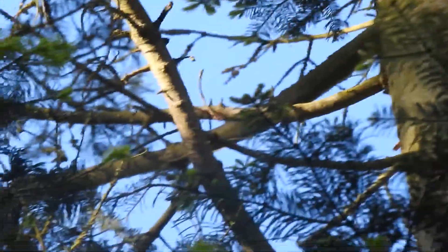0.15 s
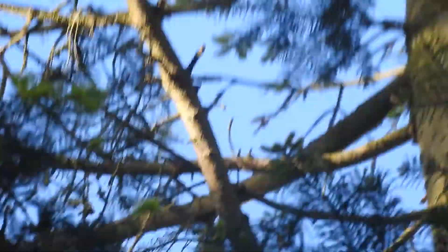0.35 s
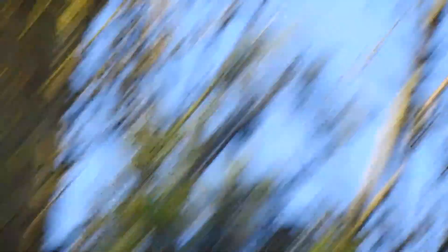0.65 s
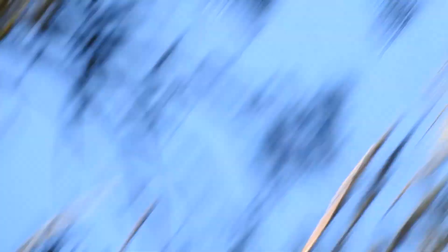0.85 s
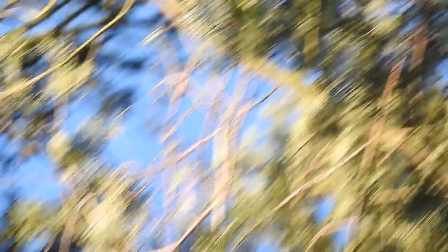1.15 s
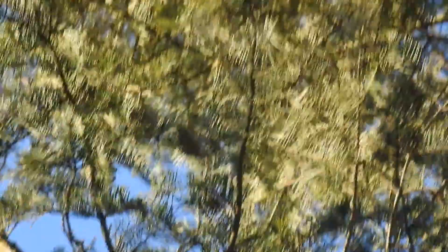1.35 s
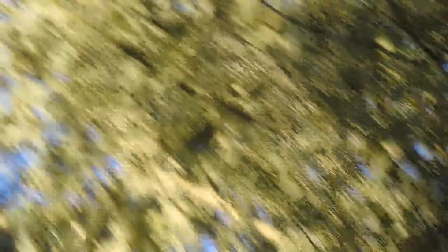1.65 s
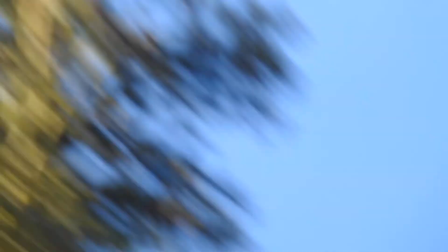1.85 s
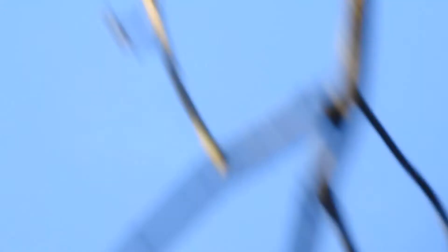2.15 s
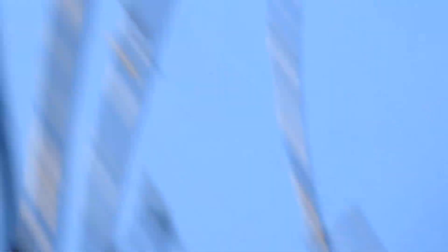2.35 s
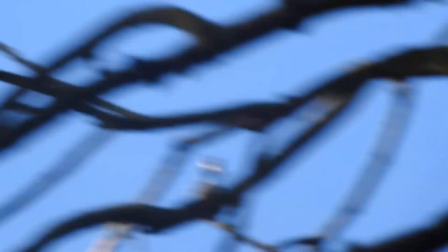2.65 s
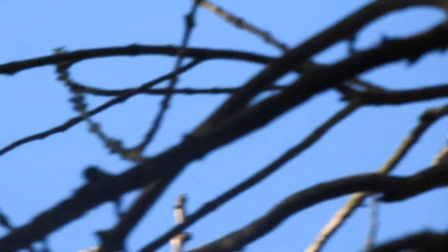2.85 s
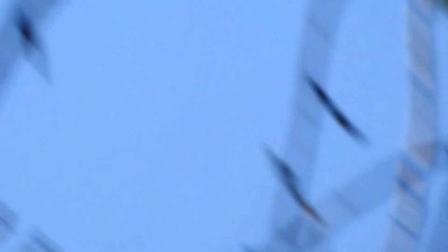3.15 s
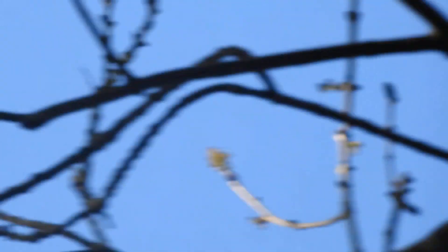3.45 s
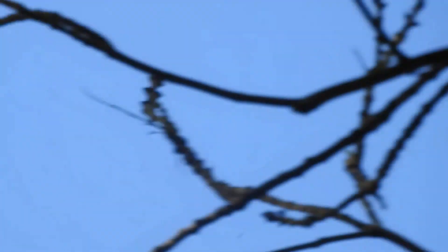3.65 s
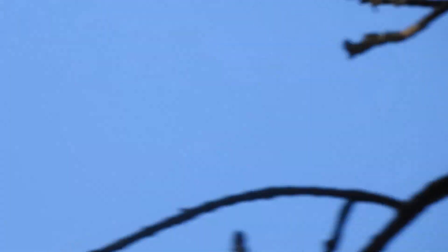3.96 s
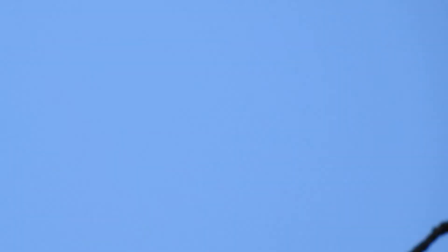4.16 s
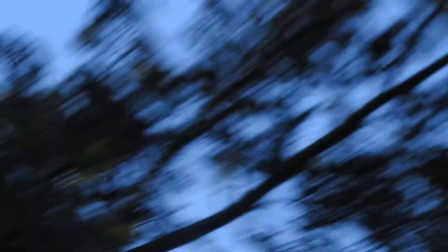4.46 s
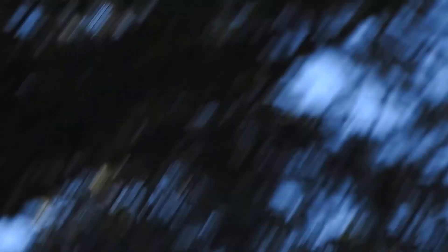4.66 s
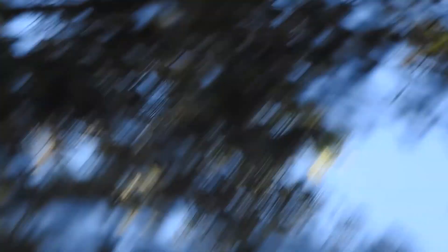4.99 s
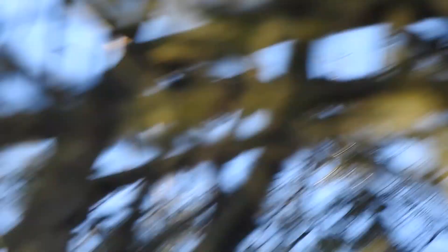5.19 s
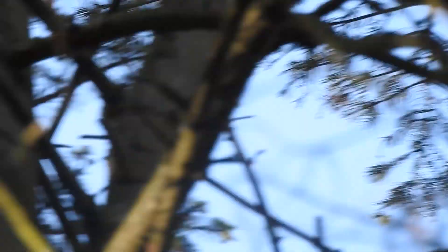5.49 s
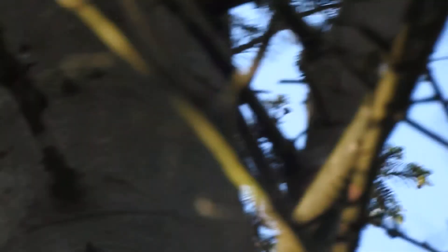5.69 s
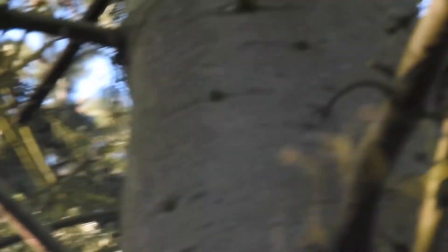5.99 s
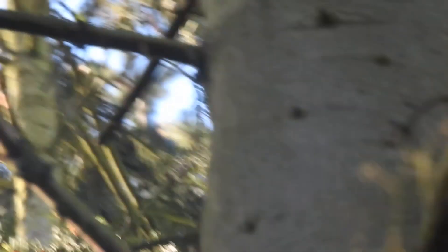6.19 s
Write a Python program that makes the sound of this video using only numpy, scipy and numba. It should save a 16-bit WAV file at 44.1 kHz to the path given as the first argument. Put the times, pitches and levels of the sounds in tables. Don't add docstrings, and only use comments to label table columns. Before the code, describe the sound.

A quiet forest in stereo, heard from a handheld camera: soft airy hush, slight hiss, faint road rumble and a blurred haze of far birds. From 0 to 2.5 seconds a thrush-like bird gives short sliding whistles, with buzzy little trills near the start. From 0.9 to about 4 seconds a warbler alternates high and low clear notes, each starting with a sharp falling chip. At 2.4 a raven tries a faint croak, then calls loudly at 2.65, 3.1 and 3.8: brief, hoarse, rattling, throaty bursts under a fifth of a second, with echoing woodland tails. Softer croaks follow at 4.4, 5.1, 5.7 and 6.3 as it moves away. A dull finger tap on the camera comes at 4.7. Traffic rumble swells around 5.3, and thin high whistles and a quick bright downward chirp sound near 5.7.

```python
import sys
import numpy as np
from scipy import signal
from scipy.fft import rfft, irfft
from scipy.io import wavfile
from scipy.ndimage import uniform_filter1d
from numba import njit

SR = 44100
rng = np.random.default_rng(int(sys.argv[2]) if len(sys.argv) > 2 else 0)


def makeup_ratio(level_db):
    decades = np.asarray(level_db, float) / 20
    return 10 ** decades


def wav_record(signal):
    frames = np.transpose(np.atleast_2d(signal))
    bounded = np.clip(frames, -1, 1)
    quanta = np.round(bounded * 32767).astype(np.int16)
    wavfile.write(sys.argv[1], SR, quanta)


N = 279135
TIME = np.arange(N) / SR


def level(x, db):
    return x * makeup_ratio(db) / np.sqrt(np.mean(x ** 2) + 1e-18)


def walk(rate_hz):
    hold = int(SR / rate_hz)
    steps = np.repeat(rng.standard_normal(N // 20)[:N // hold + 1], hold)
    return 1.16 * uniform_filter1d(uniform_filter1d(steps, hold), hold)[:N]


@njit
def svf(x, hz, width):
    y, band, low = np.empty(len(x)), 0., 0.
    for i in range(len(x)):
        g = np.tan(np.pi * hz[i] / SR)
        k = width / hz[i]
        v = (band + g * (x[i] - low)) / (1 + g * (g + k))
        band = 2 * v - band
        low = low + 2 * g * v
        y[i] = k * v
    return y


def resonate(x, hz, width_hz):
    centre = np.full(len(x), 1.) * hz
    return svf(svf(x, centre, 1.61 * width_hz), centre, 1.61 * width_hz)


def flap_gate(gone, chance):
    first_hz, last_hz = 79.6, 46.38
    flap_hz = np.interp(gone, [0, .18, .45, 1], [first_hz, .95 * first_hz, last_hz, .85 * last_hz])
    uneven = 1 + 1.6 * uniform_filter1d(chance, size=400)
    flap = .22 + np.cumsum(flap_hz * uneven) / SR
    sharpness = np.interp(gone, [0, .25, .45, 1], [.3, .55, 1.4, 2.5])
    shut = (.5 + .5 * np.cos(2 * np.pi * flap)) ** sharpness
    gate = 1 - np.interp(gone, [0, .28, .42, 1], [1, .95, .55, .4]) * shut
    return flap, shut, gate


def syrinx_turns(gone, flap, top_hz, steady):
    drop, last_hz = .74, .92 * top_hz
    hz = np.interp(gone, [0, .3, drop - .08, drop + 0.058, 1.01],
                   [.8 * top_hz, .94 * top_hz, top_hz, last_hz, 1.1 * last_hz])
    bend = .06 * np.cos(2 * np.pi * (flap - .12))
    return np.cumsum(hz * (1 - steady * bend)) / SR


def syrinx_pulses(turns, early_late, strength):
    size, jitter_cycles, shimmer_db = len(turns), .025, 2.0
    cycle = np.arange(1, int(turns[-1]))
    when = np.interp(cycle + jitter_cycles * early_late[cycle], turns, np.arange(size))
    force = makeup_ratio(shimmer_db * strength[cycle])
    pulses = np.zeros(size + 1)
    np.add.at(pulses, when.astype(int), force * (1 - when % 1))
    np.add.at(pulses, when.astype(int) + 1, force * (when % 1))
    return level(pulses[:size] - pulses.mean(), 0)


# (pitch_hz, width_hz, level_db)
THROAT_HOLLOWS = [
    (560, 110, -25),
    (923, 336, -10),
    (1140.6, 49.6, 1),
    (1293, 79.4, 6),
    (1520, 101, -4),
]


def throat_ring(rough, gone, open_hz):
    hollow_db = 10.5 * np.clip(1 - gone / 0.21, 0, 1)
    ring = 0
    for k, (hz, width_hz, db) in enumerate(THROAT_HOLLOWS):
        ring = ring + (-1) ** k * makeup_ratio(db + hollow_db * (hz < 1000)) * resonate(rough, hz, width_hz)
    beak_shut_hz = 1463
    beak_hz = beak_shut_hz + (open_hz - beak_shut_hz) * gone
    return ring - makeup_ratio(-6) * resonate(rough, beak_hz, 172.0)


# (pitch_hz, width_hz, level_db)
RASP_RINGS = [
    (2820, 435, 6.5),
    (3800, 2500, 3),
    (4720, 3200, -1.5),
    (6300, 460, -0.5),
    (8630, 2700, -47),
]


def beak_rasp(torn, gone, tilt_db):
    opening_db = -2.8 * np.clip(1 - gone / 0.86, 0, 1)
    rasp = 0
    for k, (hz, width_hz, db) in enumerate(RASP_RINGS):
        rasp = rasp + (-1) ** k * makeup_ratio(db + k * (tilt_db + opening_db)) * resonate(torn, hz, width_hz)
    return signal.sosfilt(signal.butter(3, 6400, fs=SR, output="sos"), rasp)


# (share_of_croak_0_to_1, level_db, rasp_above_throat_db, lowest_partial_db)
EFFORT = [
    (0, -27.5, 9, -9),
    (.04, -7.5, 2.5, -7),
    (.2, -1.5, -1.5, -19),
    (.45, -1.5, -1.5, -15),
    (.65, -0.5, -3.25, -19.5),
    (.78, -4.5, -5.5, -10),
    (.86, -0.5, -5, -34),
    (1, -17, -10, -17),
]
# (time_s, rasp_db, rasp_tilt_db_per_ring)
FACING = [
    (2.5, -5, 3.5),
    (3.2, -3.5, 4.5),
    (3.9, -8, 1.6),
    (4.5, -4, 0.4),
    (5.2, -10, 1.3),
    (6.3, -10, 1),
]


def croak(start_s, length_s, db, top_hz, open_hz):
    start, size = int(start_s * SR), int(length_s * SR) + 1200
    t = np.arange(size) / SR
    gone = np.clip(t / length_s, 0, 1)
    share, *columns = np.transpose(EFFORT)
    effort_db, rasp_db, low_db = (np.interp(gone, share, c) for c in columns)
    facing_s, *columns = np.transpose(FACING)
    facing_db, tilt_db = (np.interp(start_s, facing_s, c) for c in columns)

    early_late, strength, breath, flutter, hiss = rng.standard_normal((5, 16000))[:, :size]
    flap, shut, gate = flap_gate(gone, flutter)
    steady = np.interp(gone, [.69, .78], [1, .35])
    turns = syrinx_turns(gone, flap, top_hz, steady)
    clean = syrinx_pulses(turns, early_late, strength) * gate
    puff = gate * (.15 + np.exp(-(turns % 1) / .35))
    rough = clean + steady * .28 * level(puff * breath, 0)
    torn = clean + .7 * level(puff * hiss, 0)

    throat = throat_ring(rough, gone, open_hz)
    rasp = beak_rasp(torn, gone, tilt_db)
    low = (1 - 0.6 * shut) * np.clip(gone / .25, 0, 1) * np.sin(2 * np.pi * turns)
    voice = np.array([level(throat, 0) + makeup_ratio(low_db) * level(low, 0),
                      makeup_ratio(rasp_db + facing_db) * level(rasp, 0)])
    ends = np.clip(t / .003, 0, 1) * np.clip((length_s + 0.021 - t) / 0.063, 0, 1)
    out = np.zeros((2, N + size))
    out[:, start:start + size] = voice * ends * makeup_ratio(db + effort_db)
    return out[:, :N]


# (start_s, length_s, level_db, highest_pitch_hz, open_beak_ring_hz)
CROAKS = [
    (2.379, 0.24, -43.5, 407.5, 1710),
    (2.654, .17, -22.5, 392.1, 1770),
    (3.112, 0.15, -22.5, 405.1, 1720),
    (3.827, 0.17, -22, 408.8, 1630),
    (4.399, 0.18, -26, 401.3, 1870),
    (5.111, .19, -27, 418, 1820),
    (5.7, .18, -27, 401.5, 1680),
    (6.271, 0.18, -28.5, 401, 1570),
]


def raven():
    throat, rasp = sum(croak(*row) for row in CROAKS)
    return (trunks(throat, -11, pan_db=0.2, near=.7, patchy_db=1.5)
            + trunks(rasp, -4, pan_db=0.6, near=.8))


def whistle(notes, flutter_db=2.0, trill_hz=0., swing_hz=0., sweep_db=0., attack=0.15):
    out = np.zeros(N + SR)
    for start_s, first_hz, last_hz, glide_s, length_s, db in notes:
        t = np.arange(int(length_s * SR)) / SR
        left = np.exp(-t / glide_s)
        trill = swing_hz * np.sin(2 * np.pi * trill_hz * t)
        hz = last_hz + (first_hz - last_hz) * left + trill
        ends = np.clip(np.minimum(t / attack, (length_s - t) / .25) / length_s, 0, 1)
        shape = ends * makeup_ratio(db + 2.5 + sweep_db * left)
        start = max(int(start_s * SR), 0)
        out[start:start + len(t)] += shape * np.sin(2 * np.pi * np.cumsum(hz) / SR)
    return out[:N] * makeup_ratio(flutter_db * walk(90))


def gliding(notes):
    return [(start_s, first_hz, last_hz, .7 * length_s, length_s, db)
            for start_s, first_hz, last_hz, length_s, db in notes]


# (start_s, held_pitch_hz, level_db)
WARBLER = [
    (0.903, 5320, -48),
    (1.276, 4150, -44),
    (1.595, 5234, -42),
    (1.961, 3800, -42),
    (2.289, 4654, -38),
    (2.614, 5330, -40),
    (2.967, 3730, -39.5),
    (3.297, 4710, -41),
    (3.608, 5200, -39),
    (3.978, 4170, -40.5),
]


def warbler():
    fall_from_hz, fall_s, flick_s = 7550, .0065, 0.027
    held, flicks = [], []
    for start_s, hz, db in WARBLER:
        hold_s = 0.016 * hz / 1000 - 0.026
        held_db = db + 2.5 * (hz - 5000) / 1000
        held.append((start_s, fall_from_hz, hz, fall_s, hold_s, held_db))
        if hz > 5000:
            flicks.append((start_s + .04, hz, 2760, flick_s / 2, flick_s, db - 10.5))
    song = whistle(held + flicks, 1.33, sweep_db=15.5, attack=0.075)
    return trunks(song, 1.3, lag=2.3, pan_db=1.0, near=1.35, patchy_db=1.0)


# (start_s, first_pitch_hz, last_pitch_hz, length_s, level_db)
THRUSH = [(.02, 2330, 2380, 0.038, -59), (.065, 2700, 3180, 0.025, -49), (.14, 2450, 2844, .05, -53),
          (.29, 2370, 2360, 0.028, -49), (.38, 2370, 2270, .036, -65), (.47, 2370, 2350, 0.056, -79),
          (.64, 2400, 3540, 0.069, -51.5), (.68, 3200, 2320, .025, -51.5), (.815, 2150, 3700, 0.054, -48),
          (.92, 2920, 3110, 0.16, -59.5), (1.2, 2400, 3220, 0.025, -49.5), (1.27, 3050, 3010, .09, -56),
          (1.36, 2300, 3280, 0.1, -51), (1.5, 2950, 2820, .14, -63), (1.69, 2300, 3300, 0.058, -49.5),
          (1.86, 2250, 3370, 0.07, -49), (2.17, 4000, 4460, 0.035, -56), (2.255, 2500, 3045, .068, -53.5),
          (2.44, 2900, 3050, 0.083, -51)]


def thrush():
    song = whistle(gliding(THRUSH), 2.9, sweep_db=-1.0)
    return trunks(song, .5, lag=-1.3, pan_db=2.5, near=.1, patchy_db=0.5)


# (start_s, first_pitch_hz, last_pitch_hz, length_s, level_db)
TREETOP = [(0., 5600, 5250, 0.096, -57), (.55, 4600, 4530, 0.06, -55.5), (1.1, 4950, 2960, .035, -51),
           (1.14, 8500, 7480, .55, -64), (1.71, 3920, 4050, 0.067, -54.5), (3.4, 4420, 4620, 0.19, -54.5),
           (4.361, 9870, 4000, 0.0042, -43), (4.75, 8130, 7740, .33, -69), (4.89, 3480, 3370, 0.13, -58),
           (4.9, 7270, 7040, 0.26, -62), (5.02, 6190, 6000, 0.094, -54), (5.46, 4510, 4350, .29, -67),
           (5.563, 5680, 9400, 0.01, -56), (5.62, 8450, 7596, 0.41, -47.5),
           (5.66, 8150, 4870, 0.0081, -40.5), (5.751, 8200, 3300, 0.047, -37),
           (6.1, 3800, 3590, 0.47, -61.5)]


def treetop_birds():
    return trunks(whistle(gliding(TREETOP), 3.5), -5, lag=1, pan_db=-1.0)


# (start_s, first_pitch_hz, last_pitch_hz, length_s, level_db)
TRILLS = [
    (.002, 4950, 4850, 0.036, -49),
    (.185, 6200, 6610, 0.13, -54.5),
    (.21, 7160, 7330, .11, -58),
    (.6, 3410, 3410, 0.11, -62.5),
    (5.87, 6300, 6850, 0.041, -52),
]


def trilling_birds():
    return trunks(whistle(gliding(TRILLS), 3.0, trill_hz=62.4, swing_hz=345.0), 1.6, lag=2.7)


def chatter(count=90, lo_hz=2700., hi_hz=4615.0, db=-65.5):
    moment, pitch, slide, length, faint = rng.random((count, 5)).T
    hz = lo_hz * (hi_hz / lo_hz) ** pitch
    first_hz = hz * (.93 + .14 * slide)
    notes = np.transpose([1.6 + moment * 4.7, first_hz, hz, np.full(count, .04),
                          .035 + .04 * length, db - 6 * faint - 7 * moment])
    return trunks(whistle(notes, 8.8), 6.4, lag=-1.2)


# (start_s, pitch_hz, ring_s, level_db)
KNOCKS = [
    (4.67, 990, 0.025, -36),
    (4.67, 790, 0.018, -27),
    (4.67, 560, 0.065, -35.5),
    (4.681, 115, 0.1, -33),
]


def knocks():
    out = 0
    for start_s, hz, ring_s, db in KNOCKS:
        fading = makeup_ratio(db - 60 * np.maximum(TIME - start_s, 0) / ring_s) * (TIME > start_s)
        out = out + fading * np.sin(2 * np.pi * hz * (TIME - start_s))
    return out


# (pitch_hz, fade_s)
TAIL_FADE = [(300, 0.98), (800, 0.3), (1300, 1.42), (4000, 1.02), (9000, 0.34)]


def trunks(x, wet_db, lag=0, pan_db=0., near=1.0, patchy_db=6.5):
    t = TIME[:SR]
    noise = pair([(20, 0.0073), (20000, 0)])[:, :SR]
    tail = 0
    for hz in 250 * 2 ** np.arange(0, 5.6, .5):
        band = np.array([svf(side, np.full(SR, hz), hz / 3) for side in noise])
        tail = tail + band * makeup_ratio(-60 * t / along(TAIL_FADE, hz))
    build_up = np.clip(t / 0.0092, 0, 1)
    near_branches = 1 + near * np.exp(-t / 0.023)
    patches = makeup_ratio(patchy_db * walk(35.9)[:SR])
    tail = level(tail * build_up * near_branches * patches, wet_db) / np.sqrt(SR)
    direct = np.array([x, np.roll(x, int(lag))])
    echo = signal.fftconvolve(x[None], tail, axes=1)[:, :N]
    return (direct + echo) * makeup_ratio(np.array([[pan_db], [-pan_db]]) / 2)


def along(table, hz):
    table_hz, value = np.transpose(table)
    return np.interp(np.log(np.maximum(hz, 1)), np.log(table_hz), value)


# (pitch_hz, likeness_0_to_1)
ALIKE = [(60, 0.4), (130, 0.98), (290, 0.82), (640, 0.91), (1410, 0.86), (3100, 0.65), (6820, 0.04),
         (15000, 0.15)]


def pair(hz_db):
    hz = np.arange(N // 2 + 1) * SR / N
    alike = np.clip(along(ALIKE, np.maximum(hz, 95)), 0, 1)
    mid, side = rfft(rng.standard_normal((2, N))) * makeup_ratio(along(hz_db, hz))
    opposite = np.array([[1], [-1]])
    return irfft(np.sqrt(1 + alike) * mid + np.sqrt(1 - alike) * side * opposite, N)


# (time_s, level_db)
TRAFFIC = [(0, -47), (.69, -45), (1.1, -47.5), (1.4, -42), (1.83, -46.5), (2.3, -64), (3.3, -60),
           (3.9, -44.5), (4.4, -44), (4.75, -39.5), (5.0, -39.5), (5.3, -35), (5.55, -36), (5.9, -47),
           (6.13, -39.5), (6.33, -50)]


def traffic():
    colour = [(30, -48), (70, -9.5), (110, -6.0), (150, 1.5), (185, 0.5), (240, -18), (400, -71)]
    traffic_db = np.interp(TIME, *np.transpose(TRAFFIC))
    return level(pair(colour), 0) * makeup_ratio(traffic_db - 5.5 + 2.0 * walk(18))


# (pitch_hz, level_db_per_hz)
MURMUR = [(200, -28), (330, -4.5), (600, 2.5), (800, 5), (1000, -25), (1600, 0), (2200, -25)]


def road_murmur():
    return level(pair(MURMUR), -63.5) * makeup_ratio(2.2 * walk(5.7))


def far_chorus():
    low_colour = [(1500, -81), (2200, -5.5), (2400, -1.5), (2950, -0.5), (3300, -4.0), (4500, -65)]
    high_colour = [(2500, -57), (3500, -2.0), (5400, -3.5), (6600, -4.0), (7400, -10.5), (9000, -67)]
    low_db = -44 - TIME - 12.5 + 2.0 * walk(16)
    high_db = -50 - 5.0 + 4.6 * walk(8)
    return level(pair(low_colour), 0) * makeup_ratio(low_db) + level(pair(high_colour), 0) * makeup_ratio(high_db)


# (pitch_hz, level_db_per_hz)
FOREST = [(15, -46), (25, -53), (43, -6), (160, 1), (253, -8), (469, -7), (722, -14), (803, -8),
          (1620, -18), (2120, -16.5), (2770, -19.5), (3250, -24), (6380, -28), (7910, -26.5),
          (15500, -39.5)]


def still_air():
    return level(pair(FOREST), -49)


def scene():
    calls = raven() + warbler() + thrush() + treetop_birds() + trilling_birds() + chatter()
    background = traffic() + road_murmur() + far_chorus() + still_air()
    return calls + knocks() + background


def roll_off(x):
    return signal.sosfilt(signal.butter(12, 15640, fs=SR, output="sos"), x)


def record(dry):
    return roll_off(dry)


dry = scene()
out = record(dry)
wav_record(out)
```